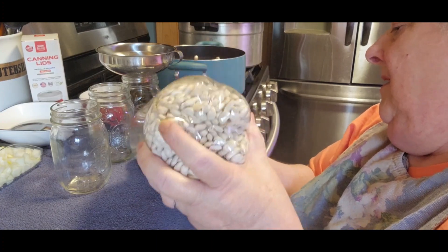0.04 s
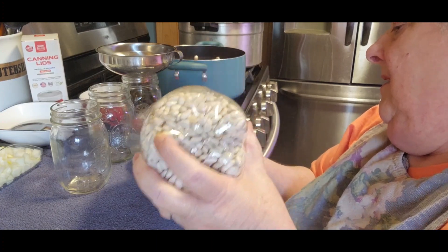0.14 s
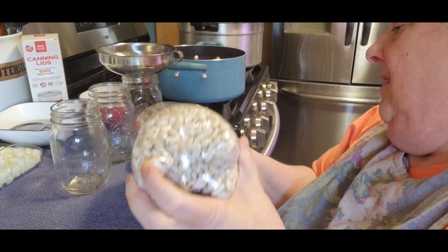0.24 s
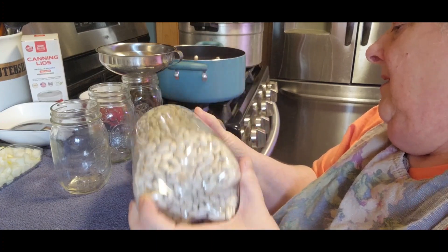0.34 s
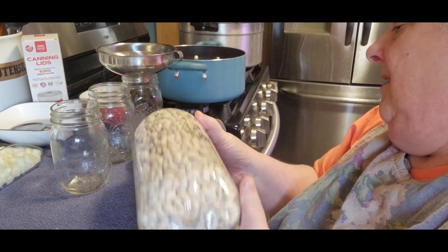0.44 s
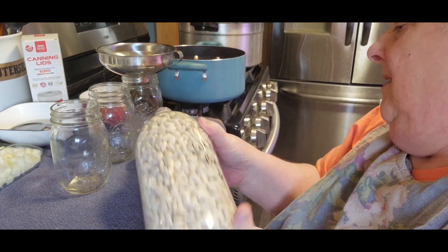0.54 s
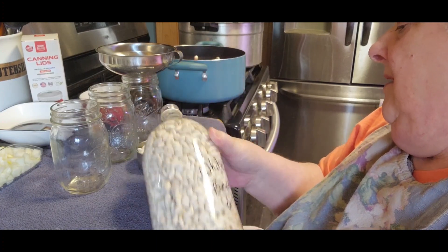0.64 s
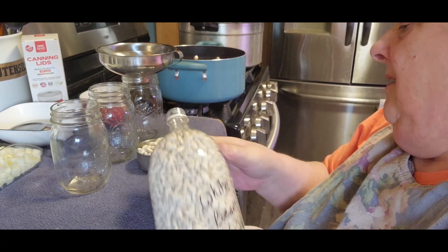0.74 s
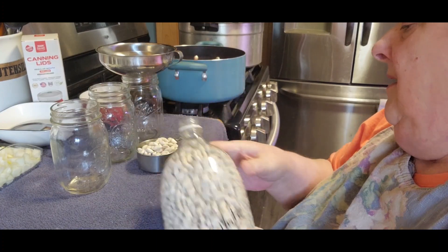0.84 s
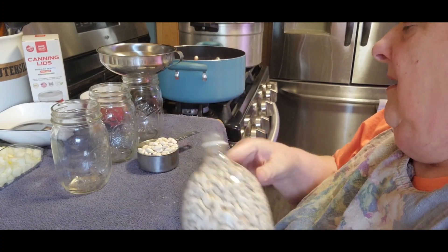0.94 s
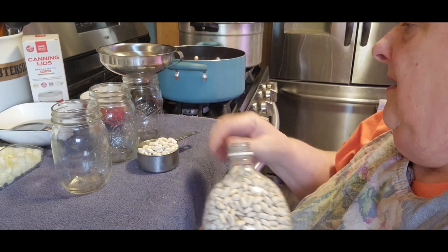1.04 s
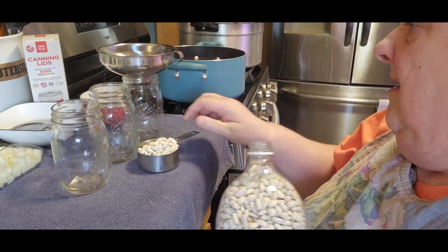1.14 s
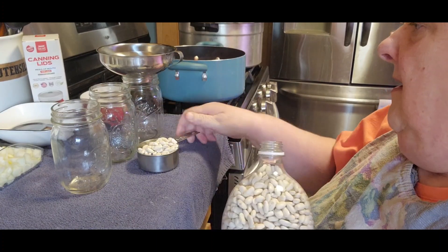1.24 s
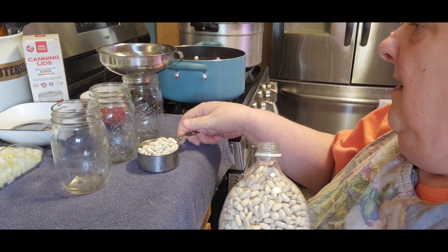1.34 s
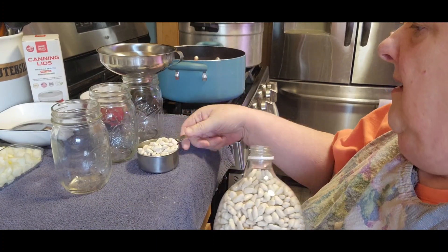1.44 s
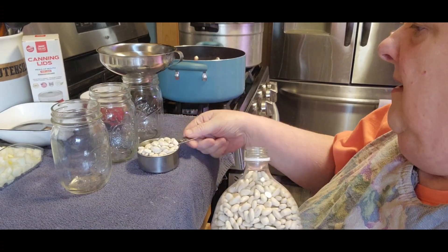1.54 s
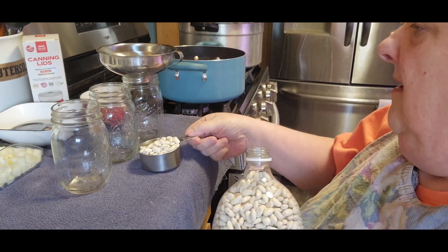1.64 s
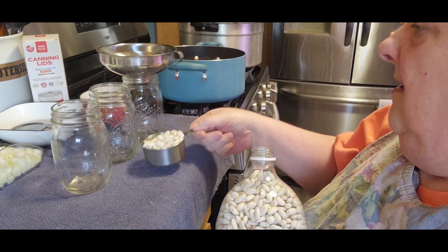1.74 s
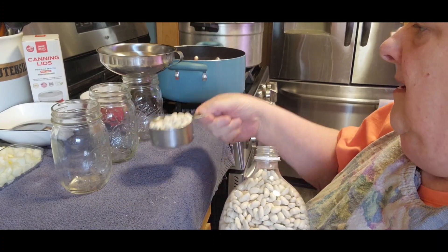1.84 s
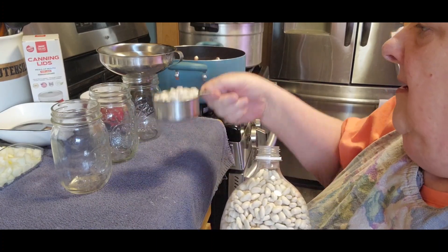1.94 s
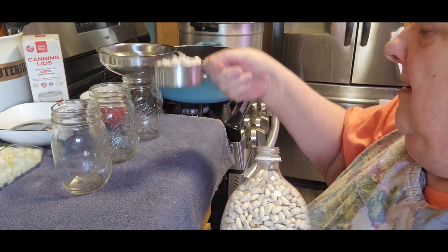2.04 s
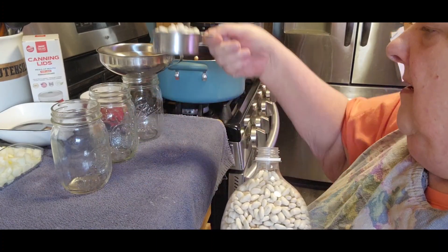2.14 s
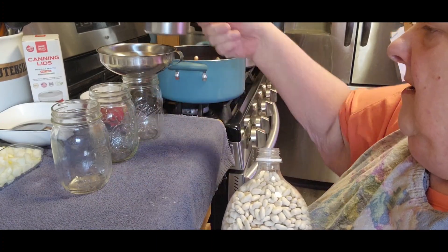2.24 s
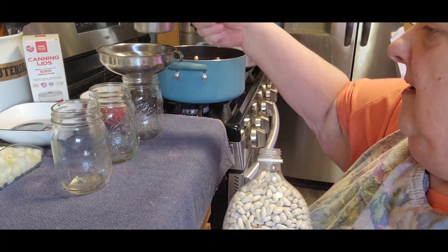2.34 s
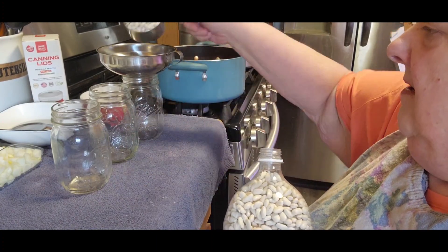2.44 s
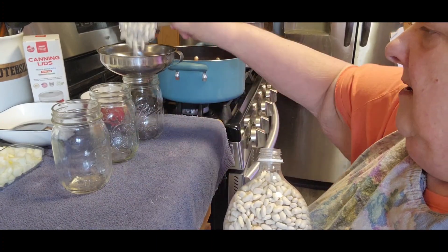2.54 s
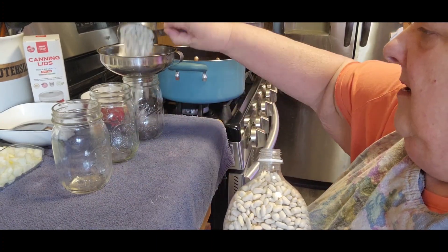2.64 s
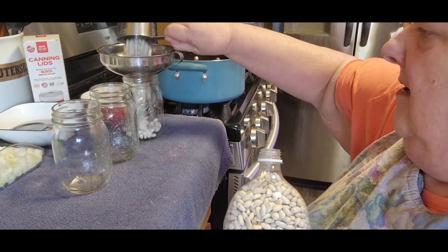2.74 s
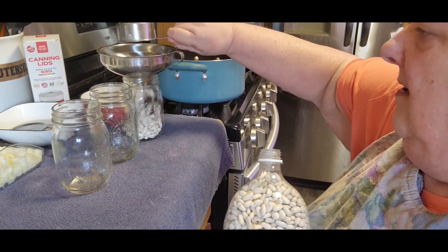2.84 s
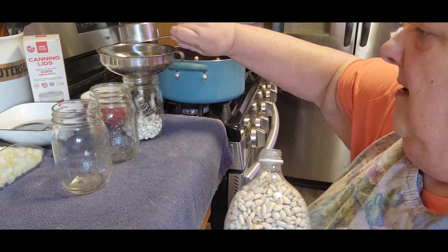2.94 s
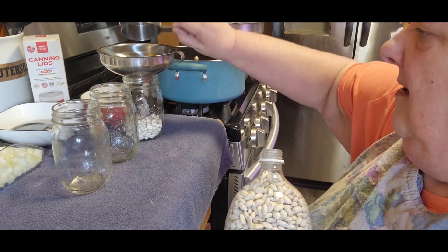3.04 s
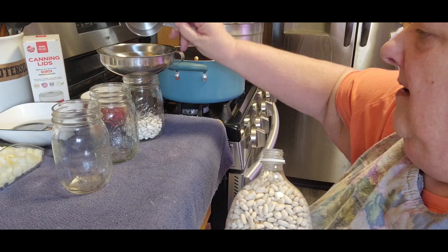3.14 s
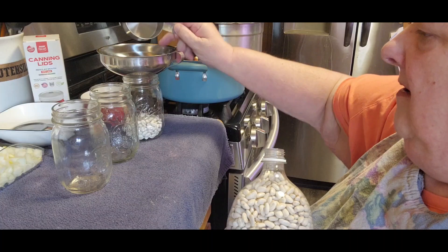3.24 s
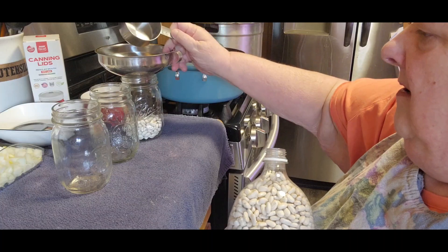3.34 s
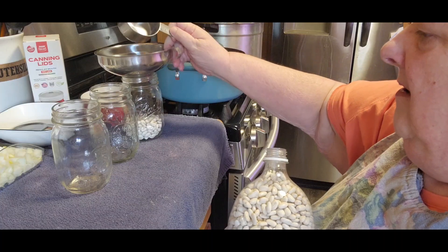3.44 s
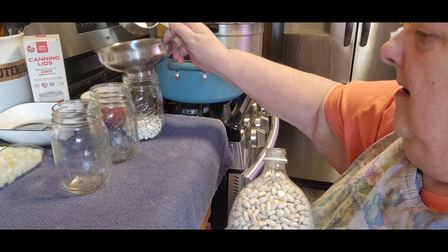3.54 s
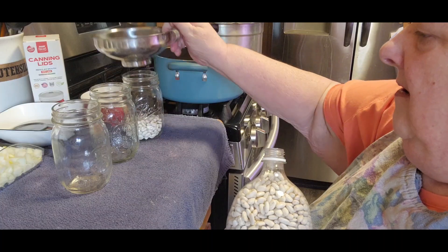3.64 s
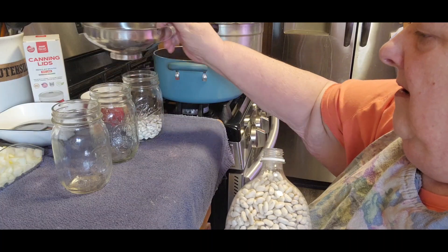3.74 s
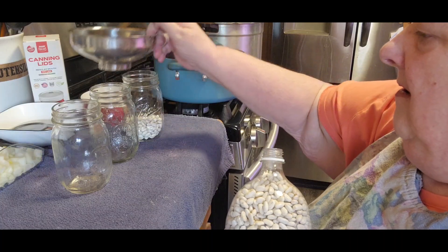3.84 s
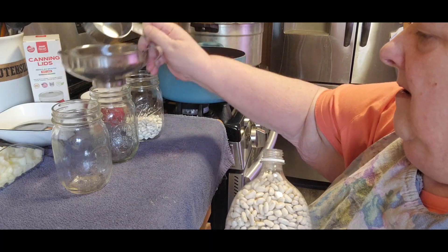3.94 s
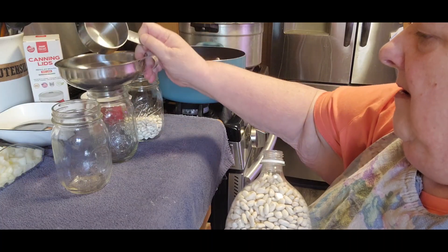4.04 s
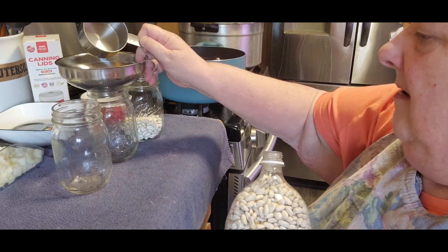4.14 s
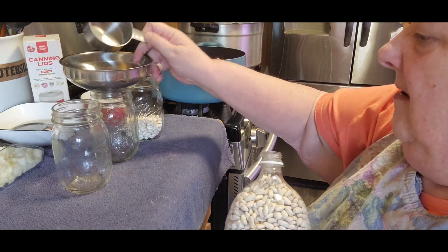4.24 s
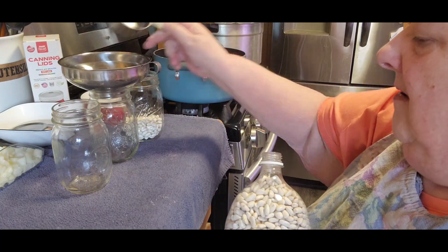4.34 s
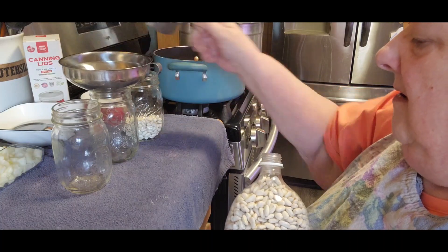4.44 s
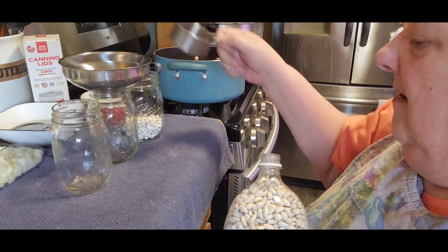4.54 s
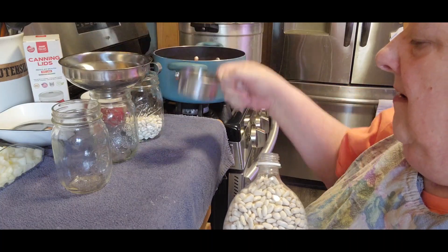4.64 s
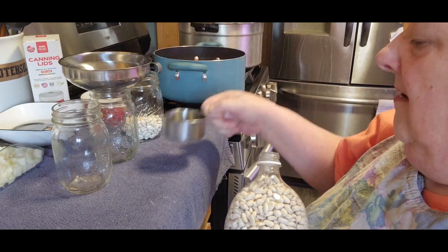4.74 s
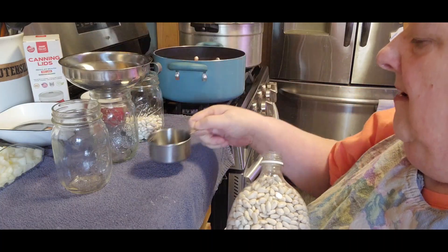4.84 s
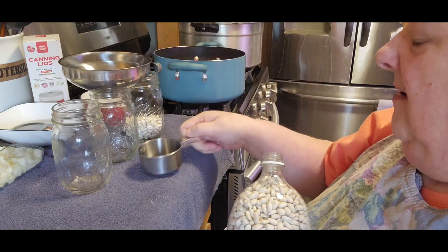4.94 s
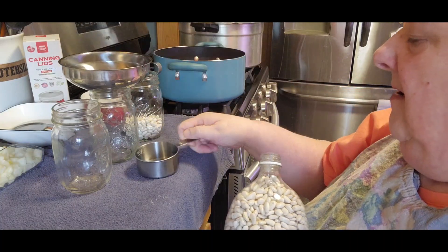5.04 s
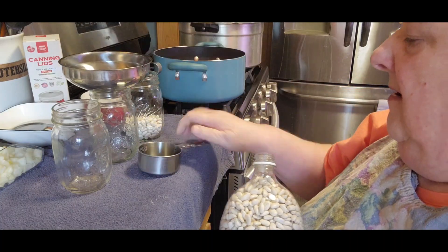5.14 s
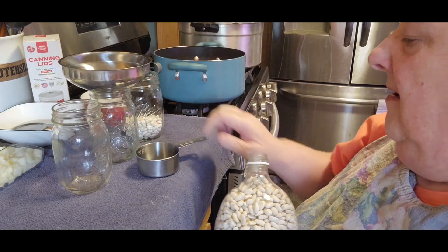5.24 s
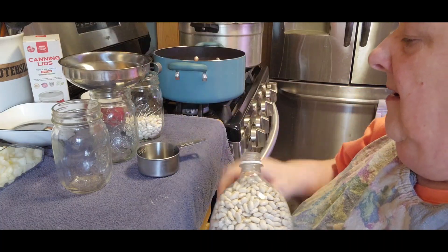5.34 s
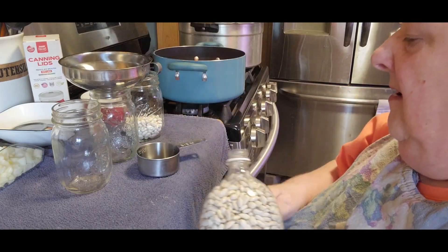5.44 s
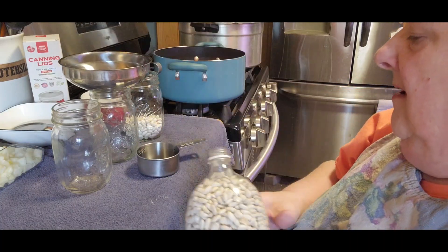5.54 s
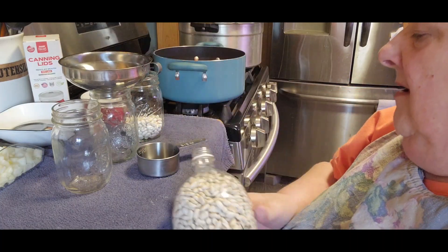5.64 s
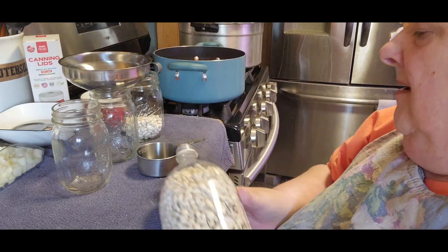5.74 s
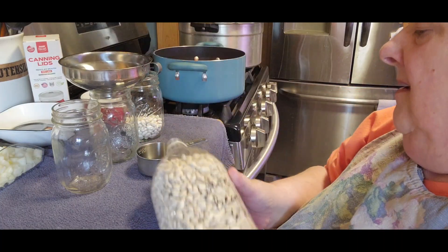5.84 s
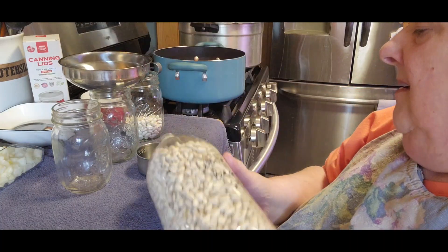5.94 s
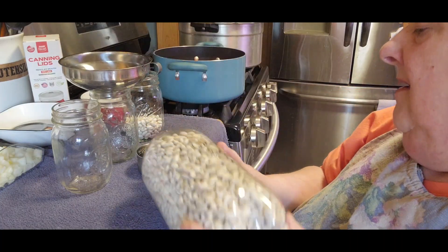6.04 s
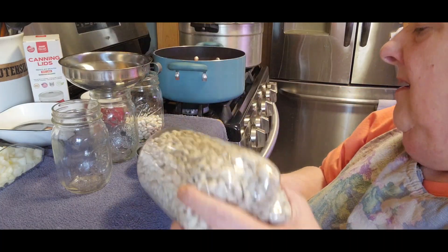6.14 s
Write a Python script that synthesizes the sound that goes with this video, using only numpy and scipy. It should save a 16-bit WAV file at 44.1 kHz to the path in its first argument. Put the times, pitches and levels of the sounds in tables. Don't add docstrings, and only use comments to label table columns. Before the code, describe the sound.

Dry beans rattle in a plastic bottle, then a cupful crashes through a steel funnel into a glass jar, and the funnel clinks onto another jar.

```python
import sys
import numpy as np
from scipy import signal
from scipy.fft import rfft, irfft
from scipy.io import wavfile
from scipy.ndimage import uniform_filter1d

SR = 44100
rng = np.random.default_rng(int(sys.argv[2]) if len(sys.argv) > 2 else 0)


def volts(x):
    e = np.asarray(x, float) / 20
    return 10 ** e


def transcribe(u):
    v = np.clip(np.atleast_2d(u).T, -1, 1)
    q = np.round(v * 32767).astype(np.int16)
    wavfile.write(sys.argv[1], SR, q)


N = 273420
T = np.arange(N) / SR
PORTS = np.array([[1], [-1]])

# pitch in Hz, level in dB per Hz.
HUM_COLOUR = [(12, -26.5), (20, -3), (48, -1), (65, -18), (98, -4), (123, -22), (188, -14.5), (381, -8.5),
              (427, -19.5), (479, -12.5), (1000, -22), (1300, -55), (2200, -120)]
AIR_COLOUR = [(530, -32), (900, -26), (1120, -14), (1490, -5), (2570, -18.5), (4740, -17), (6560, -28.5),
              (7490, -20.5), (9090, -26.5), (16000, -37.5)]
HUM_DB, AIR_DB = -60.5, -75
# pitch in Hz, width in Hz, level in dB.
HUM_BANDS = [(40, 8, -68), (95, 8.6, -77.5), (150, 14, -77.5), (193, 14, -75.5), (285, 30, -80.5),
             (742, 46, -84)]
# pitch in Hz, likeness from 0 to 1.
LIKENESS = [(30, .97), (150, .86), (600, .7), (2000, .5), (8000, .2)]
DUCK_DB, DUCK_OVER_DB, DUCK_RECOVERY_S = -2.2, -45, .6
HUM_LAG, HELD_LAG = 4, 2

# peak in seconds, wall rattle in dB, 60 dB rise in seconds,
# 60 dB fall in seconds, hollow tumble in dB compared with the wall.
SHIFTS = [(0.02, -46, .3, .7, -5), (0.11, -54, .3, .3, 9), (0.2, -51, .3, 1.2, -6), (0.55, -65, 1, 2, -6),
          (0.69, -64, .2, .8, 2), (0.85, -45, .4, .5, -5), (0.93, -42, .4, .2, 2), (1.03, -62, .5, 1.2, 0),
          (1.45, -79, 3, 3, -1), (5.55, -71, .4, .6, 7), (5.8, -68, .8, 1.2, -2), (6.08, -68, 1.5, 2, -4)]
# pitch in Hz, width in Hz, level in dB.
BOTTLE_WALL = [(2310, 1400, -5), (3340, 600, 1.5), (4200, 220, -6.5), (5040, 700, 0), (6080, 860, -4),
               (7650, 600, -4)]
BOTTLE_AIR = [(345, 67, -15.5), (612, 166, -8), (1026, 450, -12), (1510, 195, -3), (1840, 260, -7)]
PUT_DOWN_S = 4
SKIN_DB, SKIN_FOLLOWS, LOUD = -14, .87, 1e-3
# peak in seconds, level in dB, 60 dB rise and 60 dB fall in seconds.
CLOTH = [
    (3.4, -74, .5, 5),
    (4.4, -71, 3, 4),
    (4.87, -72, .6, 2),
    (5.5, -68, 1.5, 2.5),
]

# start in seconds, peak in dB, centre in Hz.
TICKS = [(0.024, -32, 7700), (0.094, -37, 1150), (0.175, -33, 4590), (0.1965, -23, 3900),
         (0.1985, -22, 7500), (0.1334, -36, 3020), (0.202, -28, 3500), (0.2486, -25, 3940),
         (0.2525, -32, 4600), (0.2694, -36, 2000), (0.2764, -36, 1900), (0.4344, -45, 3190),
         (0.3296, -28, 3700), (0.3655, -40, 3410), (0.6758, -47, 3030), (0.6838, -40, 1490),
         (0.7194, -43, 2240), (0.8024, -27, 4880), (1.0144, -39, 1430), (1.0517, -37, 3070),
         (0.7974, -22, 4500), (0.8194, -33, 1970), (0.8729, -37.5, 1400), (0.8979, -25.5, 1490),
         (1.0355, -40, 2140), (1.075, -40, 2220), (1.179, -41, 5540), (1.2083, -46, 2200),
         (2.5616, -44, 1760), (4.5744, -57.5, 1450), (5.5248, -30, 2150), (5.5252, -34, 2900),
         (5.9042, -50, 2080), (6.0917, -40, 1700), (6.114, -47, 1610)]
TICK_T60_S, TICK_DAMPING, TICK_TREBLE_DB = .05, .4, -14
# start in seconds, peak in dB, centre in Hz.
SNAPS = [
    (0.4748, -30, 5500),
    (2.6092, -31, 1730),
    (2.6529, -38, 5100),
    (5.807, -40, 4200),
]
SNAP_T60_S, SNAP_TREBLE_DB = .07, 15
# start in seconds, peak
# in dB, centre in Hz.
CLICKS = [(0.1585, -37, 5500), (0.7655, -26, 5190), (0.7826, -21, 4930), (0.7929, -18, 4900),
          (0.8364, -35, 3000), (0.8454, -34, 3500), (0.8735, -32, 3000), (4.0545, -38, 1500),
          (1.1524, -35, 5730), (1.1674, -42, 5720)]
CLICK_T60_S, CLICK_TREBLE_DB = .015, 7

# peak in seconds, board in dB, 60 dB fall in seconds, legs in dB re board.
THUMPS = [
    (0.93, -62, .4, 3),
    (2.7, -58, 1.5, -3),
    (2.968, -43, .2, -15),
    (3.05, -60, 1, -12),
    (3.6, -66, .4, -18),
    (4.055, -63, .12, 0),
    (4.18, -59, .4, -5),
]
# peak in seconds, level in dB, 60 dB fall in seconds.
JOLTS = [
    (0.92, -59, .15),
    (2.7, -58, .2),
    (2.79, -50, .15),
    (2.945, -54, .15),
    (3.15, -62, .2),
    (4.205, -52, .2),
]
# pitch in Hz, width in Hz, level in dB.
BOARD = [(118, 16, 0), (149, 7.7, 1), (183, 38, -4), (225, 40, -8)]
LEGS = [(49.4, 19, -0.5), (70, 17, -2)]
JAR_AIR = [(473, 25.8, 1), (331.6, 60, -13.5), (540, 50, -8)]
THUMP_RISE_S = .1

# time in seconds, level in dB.
SLIDE = [
    (2.53, -66.5),
    (2.604, -56.5),
    (2.61, -48),
    (2.674, -52),
    (2.683, -40),
]
# pitch in Hz, level in dB per Hz.
SLIDE_COLOUR = [(470, -63.5), (800, -29), (852, -30), (1720, 14), (2500, -5.5), (5580, 1.5), (10300, -14),
                (11600, 3.5), (16000, -30.5)]
# time in seconds, force in dB.
POUR = [(2.689, -14.5), (2.755, -13), (2.774, -20), (2.788, -12), (2.84, -15), (2.905, -28), (2.95, -31),
        (3.01, -27), (3.09, -42), (3.24, -72)]
# pitch in Hz, width in Hz, level in dB.
FUNNEL_ON_JAR = [(1486, 120, -28), (1766, 50, -17.5), (2670, 110, -21.5), (3115, 130, -15),
                 (3876, 120, -14), (4180, 70, -12), (5100, 42, -11), (5627, 33, -8), (6120, 40, -11.5),
                 (6450, 40, -10.5), (6940, 49, -10), (7200, 31, -4.5), (7420, 110, -9), (7580, 19, -3.5),
                 (7700, 36, 2), (7550, 86, 0), (8130, 64, -10.5), (8430, 20, -7), (9330, 160, -9),
                 (9920, 38, -11), (13030, 40, -9), (13720, 22, -9), (14080, 30, -6), (15170, 60, -4)]
JAR = [(2224, 200, -22), (2990, 200, -16), (4290, 50, -10), (5150, 31, -5.5), (5637, 85, 1.5),
       (6170, 71, -9), (6370, 30, -16), (6970, 32, 2), (7140, 42, -14), (7420, 81, -4), (7630, 52, -11.5),
       (8200, 40, -15), (8300, 27, -18), (9170, 160, -17)]
# pitch in Hz, width in Hz.
POUR_GAPS = [(2400, 50), (3470, 110), (4790, 100)]
# pitch in Hz, level in dB per Hz.
CLATTER_COLOUR = [(240, -58), (700, -35), (1500, -28), (2400, -24), (3070, -22), (3500, -35.5), (4000, -24),
                  (4900, -27), (5600, -19), (7400, -8), (8800, -15), (10000, -19.5), (14800, -13),
                  (16000, -15.5)]
# start in seconds, peak in dB, share in the jar from 0 to 1.
DROPS = [(2.6878, -6, 0.15), (2.7836, -7, 0.8), (2.8024, -9.5, 0.4), (2.8294, -11, 0.9), (2.9637, -22, 0.9),
         (2.9991, -20, 1), (3.0174, -28, 0.87), (3.1014, -29, 0.6), (3.1702, -40, 0.55), (3.1817, -33, 1),
         (3.2276, -36, 1), (3.2909, -45, 0.96)]
THROUGH_S, THROUGH_SPREAD_S = 2.87, .05
STREAM = (2.689, -12.5, 2.84, -17, 2.95, -32, 3.33, -66)
# peak in seconds, level in dB, 60 dB rise and 60 dB fall in seconds.
HEAP = [
    (2.82, -47, .5, .6),
    (2.93, -53, .3, .8),
    (3.1, -57, .6, .8),
]
# pitch in Hz, level in dB per Hz.
HEAP_COLOUR = [(120, -25), (260, 0), (500, 1), (1050, -4), (1800, -6), (2500, -14), (3500, -9), (5000, -30)]

# start in seconds, peak in dB, pitch in Hz, 60 dB fall in seconds.
PINGS = [(2.69, -17, 7040, .08), (2.752, -17, 6450, .08), (2.756, -15, 7430, .08), (2.7846, -8, 7600, .12),
         (2.795, -16, 5627, .25), (2.797, -20, 3100, .08), (2.804, -10, 7650, .1), (2.83, -14, 7420, .08),
         (2.87, -20, 7600, .1), (2.915, -25, 5630, .12), (3.102, -42, 4300, .05), (3.102, -39, 8200, .04),
         (3.182, -32, 5680, .04), (3.183, -39, 6200, .04), (3.228, -40, 5640, .06), (3.229, -39, 7400, .05),
         (3.291, -37, 5640, .04), (3.291, -52, 3600, .03), (3.291, -47, 6200, .04), (3.411, -43, 1290, .04),
         (3.419, -42, 1260, .04), (3.48, -37, 3240, .04), (4.055, -36, 5060, .2), (4.055, -42, 6400, .2),
         (4.082, -38, 2650, .08), (4.092, -29, 3190, .04), (4.092, -32, 1600, .05), (4.1, -24, 5200, .06),
         (4.104, -15, 7250, .06), (4.121, -29, 3750, .04), (4.155, -33, 1320, .08), (4.171, -28, 5300, .15),
         (4.176, -33, 1350, .05), (4.198, -28, 3000, .05), (4.205, -30, 1500, .04), (4.208, -29, 8200, .08),
         (4.219, -32, 5200, .06),
         (2.689, -21, 8480, .06), (2.734, -18, 7320, .07), (2.743, -19, 15170, .08),
          (2.743, -18, 7650, .08), (2.759, -15, 7650, .07), (2.824, -23, 6600, .06),
          (2.875, -26, 8270, .06), (2.915, -30, 6500, .08), (2.935, -40, 4250, .1), (2.96, -39, 3010, .06),
          (2.982, -36, 6200, .06), (2.986, -36, 14640, .05), (2.999, -30, 6200, .06),
          (2.999, -26, 5620, .08), (3.016, -33, 6200, .06), (3.016, -28, 5660, .08),
          (3.019, -34, 7060, .06), (3.034, -34, 5620, .08), (3.035, -41, 3010, .08),
          (3.057, -43, 3050, .05), (3.067, -34, 5660, .1), (3.102, -45, 3010, .06), (3.125, -45, 5660, .07),
          (3.49, -52, 2460, .1), (3.525, -52, 5090, .2), (3.544, -47, 8440, .08), (3.547, -51, 2470, .12),
          (3.579, -48, 8440, .05), (3.604, -50, 2470, .1), (4.084, -32, 2750, .06),
          (4.103, -32, 13600, .05), (4.137, -31, 6880, .08), (4.146, -32, 5150, .08),
          (4.158, -31, 6880, .08), (4.174, -34, 5650, .08), (4.217, -37, 3270, .05),
          (4.254, -41, 7920, .05)]
PING_SPLIT, PING_RISE_S, PING_TURN = .006, .0008, .7

# peak in seconds, level in dB, 60 dB rise and 60 dB fall in seconds.
CUP_TAPS = [
    (3.411, -40, .004, .03),
    (3.416, -40, .01, .08),
]
# pitch in Hz, width in Hz, level in dB.
CUP_ON_FUNNEL = [(1296, 160, -4), (1945, 110, -4), (3150, 110, -6), (4120, 32, -4), (5660, 84, -10),
                 (6550, 34, -15), (7020, 31, -7), (7420, 64, -11), (5270, 30, -16), (7880, 40, -17),
                 (8320, 60, -13), (9140, 40, -17)]
FUNNEL_ON_GLASS = [(1650, 100, -17.5), (2420, 48, -12.5), (2930, 51, -8), (3160, 40, -1), (3950, 77, -22),
                   (5098, 20, -15), (5652, 40, -19), (1954, 40, -22), (4860, 38, -18), (6500, 40, -10),
                   (7460, 69, 0), (7800, 42, -13), (8400, 40, -10), (9540, 30, -17)]
# peak in seconds, level in dB, 60 dB rise in seconds, 60 dB fall in seconds,
# rasp in dB compared with the level, drive of the free ring in dB.
LIFT = [
    (3.481, -33, .004, .04, -9, -70),
    (3.488, -25.5, .012, .052, -9.5, -60),
    (3.542, -52, .03, .15, 12, -47),
    (3.568, -47, .06, .12, 2, -42),
    (3.612, -50, .15, .12, 4, -45),
]
# pitch in Hz, level in dB, 60 dB fall in seconds, beat in Hz, one lull in seconds.
FREE_RING = [(1114, -30, 0.12, 2, 3.8), (2455, -6, 1.5, 3.6, 3.715), (3130, -22, .12, 5, 3.7),
             (3731, 0, 0.62, 5.2, 3.66), (5073, -1.5, 0.85, 8, 3.785), (6418, -12, 0.16, 9, 3.64),
             (7715, -14, 0.25, 6.7, 3.66), (8385, -20, 0.07, 9, 3.6)]
# time in seconds, level in dB.
SETTLE = [
    (4.052, -39),
    (4.08, -38),
    (4.105, -22),
    (4.128, -31),
    (4.215, -29),
    (4.26, -40),
    (4.29, -60),
    (4.33, -78),
]
# pitch in Hz, width in Hz, level in dB.
SEATED = [(1432, 40, -9.5), (2658, 90, -8), (3013, 90, -9), (3270, 150, -15), (3785, 70, -6),
          (4100, 80, -9), (5100, 90, -1), (5330, 80, -2), (6380, 71, -12), (6880, 70, 2), (7200, 60, 4),
          (7710, 39, -11.5), (8160, 90, -1), (9500, 49, -11.5), (1136, 96, -9), (1600, 150, -12),
          (2070, 82, -19)]
SEATING_RING_DB, SEATING_CLATTER_DB = -22, -4.5
SEAT_S, SEAT_SPREAD_S = 4.088, .006
GRIP_S, GRIP_FADE_S = 4.1, .016
TWIN = .65

ROOM_T60_S, ROOM_DB = .25, -5
SILENT_DB = -100


def level_curve(table):
    s, db = np.transpose(table)
    inside = (T >= s[0]) & (T <= s[-1])
    return np.where(inside, volts(np.interp(T, s, db)), 0)


def swells(s, db, rise, fall):
    power = np.zeros(N)
    for peak_s, peak_db, rise_s, fall_s in np.broadcast(s, db, rise, fall):
        a = int(max(peak_s - rise_s / 2, 0) * SR)
        b = int((peak_s + fall_s * (peak_db - SILENT_DB) / 60) * SR)
        late = T[a:b] - peak_s
        power[a:b] += volts(peak_db - 60 * np.maximum(late / fall_s, -late / rise_s)) ** 2
    return np.sqrt(power)


def impacts(per_s, scatter_db, dense=.3):
    chance, size = rng.random((2, N))
    size_db = np.minimum(-scatter_db * np.log(size + 1e-9), 4 * scatter_db)
    hits = (chance < per_s / SR) * volts(size_db)
    return hits / np.sqrt(np.mean(hits ** 2)) + dense


def blows(times, gains):
    x = np.zeros(N)
    np.add.at(x, (np.asarray(times) * SR).astype(int), gains)
    return x


def across(points, hz):
    f, v = np.transpose(points)
    return np.interp(np.log(np.maximum(hz, 1)), np.log(f), v)


def colour(x, points, size=1024):
    c = irfft(across(points, np.fft.rfftfreq(size, 1 / SR)) * np.log(10) / 20)
    c[1:size // 2] *= 2
    c[size // 2 + 1:] = 0
    h = irfft(np.exp(rfft(c)))
    return signal.oaconvolve(x, h[None] / np.linalg.norm(h), axes=1)[:, :x.shape[1]]


def crackle(force, points, wide=.8):
    out = np.zeros((2, N))
    a, b = np.flatnonzero(force)[[0, -1]] + [0, SR // 20]
    mid, side = force[a:b] * rng.standard_normal((2, len(force[a:b])))
    side = signal.lfilter([.8, -.8], [1, -.6], side)
    both = np.array([mid + wide * side, mid - wide * side]) / np.hypot(1, wide)
    out[:, a:b] = colour(both, points)
    return out


def ring(force, peaks, spread=1.2, patchy_db=3, order=1):
    hz, width, db = np.transpose(peaks)
    power = volts(db) ** 2 * width
    out = np.zeros((2, N))
    a, b = np.flatnonzero(force)[[0, -1]] + [0, SR // 4]
    n = len(force[a:b])
    knots = np.arange(0, n + 1024, 1024)
    for f, w, share in zip(hz, width, power / power.sum()):
        r = np.exp(-np.pi * w * order / SR)
        spot = np.interp(np.arange(n), knots, volts(patchy_db * rng.standard_normal(len(knots))))
        z = force[a:b] * rng.standard_normal(n) * spot
        z = z * np.sqrt(2 * share * (1 - r * r) ** (2 * order - 1) / (1 + r * r) ** (order - 1))
        for _ in range(order):
            z = signal.lfilter([1], [1, -r * np.exp(2j * np.pi * f / SR)], z)
        turn = spread * min(f / 6000, 1.3) * rng.choice([-1, 1]) * rng.uniform(.54, 1)
        out[:, a:b] += np.cos(turn) * z.real - np.sin(turn) * z.imag * PORTS
    return out


def sing(force, peaks, spread=.29, uneven_db=0):
    hz, width, db = np.transpose(peaks)
    power = volts(db) ** 2 * width
    out = np.zeros((2, N))
    a, b = np.flatnonzero(force)[[0, -1]] + [0, SR // 2]
    for f, w, share in zip(hz, width, power / power.sum()):
        keep = np.exp(-2 * np.pi * w / SR)
        push = (force[a:b] * volts(uneven_db * rng.uniform(-2, 1, len(force[a:b])))) ** 2
        size = np.sqrt(signal.lfilter([2 * share * (1 - keep)], [1, -keep], push))
        size = uniform_filter1d(size, size=48)
        start = 2 * np.pi * rng.random()
        turn = spread * min(f / 6000, 1.3) * rng.choice([-1, 1])
        out[:, a:b] += size * np.cos(2 * np.pi * f * T[a:b] + start + turn * PORTS)
    return out


def shimmer(x, t60):
    t = np.arange(SR // 8) / SR
    modes = rng.standard_normal(len(t)) * np.exp(-np.log(1000) * t / t60)
    return signal.fftconvolve(x, modes[None] / np.linalg.norm(modes), axes=1)[:, :N]


def kitchen():
    hz = np.fft.rfftfreq(N, 1 / SR)
    like = across(LIKENESS, hz)
    tone_power = sum(volts(db) ** 2 * w for _, w, db in HUM_BANDS) / 8
    out = ring(np.ones(N), HUM_BANDS, patchy_db=3.5) * np.sqrt(tone_power)
    for points, db in ((HUM_COLOUR, HUM_DB - 3), (AIR_COLOUR, AIR_DB)):
        noise = rfft(rng.standard_normal((2, N)))
        mid, side = noise * volts(across(points, hz)) * np.sqrt([1 + like, 1 - like])
        air = irfft([mid + side, mid - side], N)
        out += air * volts(db) / air.std()
    return out * volts(.4 * PORTS)


def bottle():
    s, db, rise, fall, depth_db = np.transpose(SHIFTS)
    gain = swells(s, db, rise, fall)
    sliding = gain * impacts(1100, 2.3, dense=.5)
    tumbling = swells(s, db + depth_db, rise, fall) * impacts(900, 3.5, dense=.64)
    spells = T < PUT_DOWN_S, T > PUT_DOWN_S
    wall = sum(ring(sliding * spell, BOTTLE_WALL, spread=1.0, patchy_db=5.5) for spell in spells)
    wall = signal.sosfilt(signal.butter(4, [1800, 8200], "band", fs=SR, output="sos"), wall)
    cavity = sum(ring(tumbling * spell, BOTTLE_AIR, spread=1.0, patchy_db=3.5) for spell in spells)
    cavity = signal.sosfilt(signal.butter(2, 2600, fs=SR, output="sos"), cavity)
    skin = volts(SKIN_DB) * LOUD * (gain / LOUD) ** SKIN_FOLLOWS
    skin_colour = [(6000, -25), (8500, 5), (11000, 6), (14000, 11), (16500, 7)]
    skins = crackle(skin * impacts(900, 3, dense=.8), skin_colour, wide=.6)
    cloth_colour = [(900, -48), (1600, -6), (4000, -2.5), (7500, 2), (9500, -12), (15000, -16)]
    cloth = crackle(swells(*np.transpose(CLOTH)), cloth_colour, wide=1.0)
    return (volts(.3) * wall + volts(-1.5) * cavity + volts(5.5) * skins + cloth) * volts(PORTS)


def ticks():
    out = np.zeros((2, N))
    t = np.arange(4096) / SR
    events = [(*row, TICK_TREBLE_DB, TICK_T60_S * (2000 / row[2]) ** TICK_DAMPING) for row in TICKS]
    events += [(*row, SNAP_TREBLE_DB, SNAP_T60_S) for row in SNAPS]
    events += [(*row, CLICK_TREBLE_DB, CLICK_T60_S) for row in CLICKS]
    treble = signal.butter(4, 8500, "high", fs=SR, output="sos")
    for s, db, hz, treble_db, t60 in events:
        noise = rng.standard_normal((3, len(t)))
        noise = noise[:2] + noise[2]
        swing = t * hz / 1.2
        wave = np.sin(2 * np.pi * hz * t) + .4 * np.sin(3.1 * np.pi * hz * t)
        snap = wave * 2 * swing * np.exp(-swing)
        tail = np.exp(-np.log(1000) * t / t60)
        edges = [.6 * hz, min(1.7 * hz, 9000)]
        body = signal.sosfilt(signal.butter(2, edges, "band", fs=SR, output="sos"), noise)
        spit = signal.sosfilt(treble, noise)
        sound = volts(db) * (snap + tail * (.4 * body + .1 * volts(treble_db) * spit))
        i = int(s * SR)
        out[:, i:i + len(t)] += sound[:, :N - i]
    return out * volts(PORTS)


def table():
    shake = impacts(250, 2.5, dense=.9) / 1.6
    s, db, fall, legs_db = np.transpose(THUMPS)
    board = sing(shake * swells(s, db, THUMP_RISE_S, fall), BOARD)
    legs = sing(shake * swells(s, db + legs_db, THUMP_RISE_S, fall), LEGS)
    s, db, fall = np.transpose(JOLTS)
    jar_air = sing(shake * swells(s, db, THUMP_RISE_S, fall), JAR_AIR)
    return volts(5) * (board + legs + jar_air)


def pour():
    slide = crackle(level_curve(SLIDE) * impacts(1500, 1.8, dense=.8), SLIDE_COLOUR)
    share = .5 + .5 * np.tanh((T - THROUGH_S) / THROUGH_SPREAD_S / 2)
    beans = level_curve(POUR) * impacts(700, 3.4, dense=.34)
    walls = ring(beans * np.sqrt(1 - share), FUNNEL_ON_JAR, spread=.95, patchy_db=4, order=2)
    walls += ring(beans * np.sqrt(share), JAR, spread=.8, patchy_db=3.5, order=2)
    s, db, inside = np.transpose(DROPS)
    on_funnel = blows(s, volts(db + 21.5) * np.sqrt(1 - inside))
    in_jar = blows(s, volts(db + 22) * np.sqrt(inside))
    clinks = sing(on_funnel, FUNNEL_ON_JAR, spread=.9, uneven_db=5)
    clinks += sing(in_jar, JAR, spread=1.0, uneven_db=5)
    stream = level_curve(np.reshape(STREAM, (4, 2))) * impacts(1200, 3, dense=.5)
    dry_clatter = crackle(stream + blows(s, volts(db - 12)), CLATTER_COLOUR, wide=.85)
    fall = volts(-3.5) * walls + volts(-4) * clinks + shimmer(dry_clatter, t60=.07)
    for hz, width in POUR_GAPS * 2:
        fall = signal.lfilter(*signal.iirnotch(hz, hz / width, fs=SR), fall)
    heap = crackle(swells(*np.transpose(HEAP)) * impacts(500, 3.5, dense=.5), HEAP_COLOUR, wide=1.2)
    return slide + heap + fall * volts(-.6 * PORTS)


def pings():
    out = np.zeros((2, N))
    t = np.arange(SR // 4) / SR
    for s, db, hz, t60 in PINGS:
        turn = PING_TURN * hz / 6000 * PORTS * rng.choice([-1, 1])
        neighbour = np.sin(2 * np.pi * (hz * (1 + PING_SPLIT) * t + rng.random()) - turn)
        pair = np.sin(2 * np.pi * hz * t + turn) + .4 * neighbour
        i = int(s * SR)
        out[:, i:i + len(t)] += volts(db - 60 * t / t60) * (1 - np.exp(-t / PING_RISE_S)) * pair
    return out


def funnel():
    touch = swells(*np.transpose(CUP_TAPS)) * impacts(3000, 2.1, dense=.89)
    s, db, rise, fall, rasp_db, ring_db = np.transpose(LIFT)
    grit = impacts(2200, 1.6, dense=.77)
    scrape, rub, strike = (grit * swells(s, level, rise, fall) for level in (db, db + rasp_db, ring_db))
    chatter = level_curve(SETTLE) * impacts(700, 2.5, dense=.8)
    drive = strike + chatter * volts(SEATING_RING_DB)
    bell = np.zeros((2, N))
    for hz, level, t60, beat, lull in FREE_RING:
        mode = sing(drive, [(hz, np.log(1000) / (np.pi * t60), 0)])
        beating = np.abs(1 - TWIN * np.exp(2j * np.pi * beat * (T - lull)))
        bell += volts(level - 10) / np.sqrt(t60) * mode * beating
    bell *= np.exp(-np.maximum(T - GRIP_S, 0) / GRIP_FADE_S)
    seated = chatter * (.6 + .4 * np.tanh((T - SEAT_S) / SEAT_SPREAD_S))
    rims = volts(-8) * sing(touch, CUP_ON_FUNNEL)
    rims += volts(-7.5) * sing(scrape, FUNNEL_ON_GLASS, uneven_db=4)
    rims += volts(-4) * ring(seated, SEATED, patchy_db=3.5, order=2)
    rasp_colour = [(600, -2), (1500, -7.5), (5000, 5), (9000, -2.5), (14500, -2.5), (15500, -17)]
    rasp = crackle(volts(-6) * touch + volts(-5) * rub + volts(-11) * chatter, rasp_colour)
    clatter = crackle(volts(SEATING_CLATTER_DB) * seated, CLATTER_COLOUR)
    return bell + rims + shimmer(rasp, t60=.092) + shimmer(clatter, t60=.026)


def room(x):
    t = np.arange(SR // 2) / SR
    noise = rng.standard_normal((2, len(t)))
    low = signal.lfilter([.3], [1, -.7], .6 * noise + .23 * noise.sum(0))
    fall = np.log(1000) * t / ROOM_T60_S
    tail = (low * np.exp(-fall) + (noise - low) * np.exp(-1.5 * fall)) * (t > .004)
    tail = signal.sosfilt(signal.butter(2, 350, "high", fs=SR, output="sos"), tail)
    tail /= np.linalg.norm(tail, axis=1, keepdims=True)
    return volts(ROOM_DB) * signal.fftconvolve(x.mean(0)[None], tail, axes=1)[:, :N]


def scene():
    hum = kitchen()
    held = bottle() + ticks()
    held[1] = np.roll(held[1], HELD_LAG)
    near = held + table() + pour() + pings() + funnel()
    keep = np.exp(-1 / (DUCK_RECOVERY_S * SR))
    loudness = np.minimum(np.abs(near).mean(0) / volts(DUCK_OVER_DB), 1)
    recent = signal.lfilter([1 - keep], [1, -keep], loudness)
    hum = hum * volts(DUCK_DB * 2 * recent)
    hum[1] = np.roll(hum[1], HUM_LAG)
    return near + room(near) + hum


def roll_off(x):
    return signal.sosfilt(signal.butter(12, 16470, fs=SR, output="sos"), x)


def record(dry):
    soft = np.tanh(1.3 * dry) / 1.3
    mix = signal.sosfilt(signal.ellip(10, .2, 45, 15650, fs=SR, output="sos"), soft)
    return roll_off(mix)


dry = scene()
out = record(dry)
transcribe(out)
```